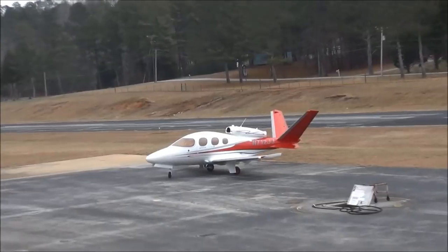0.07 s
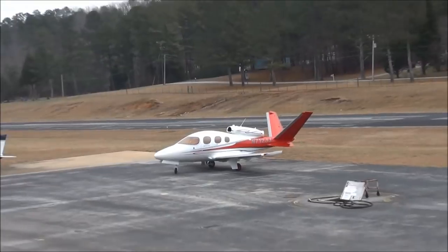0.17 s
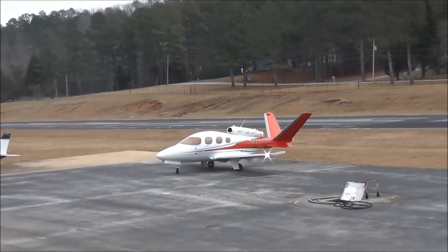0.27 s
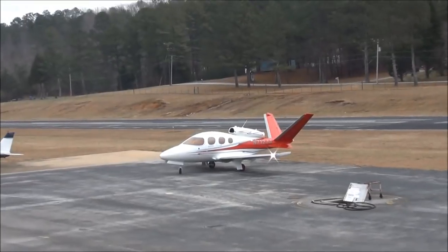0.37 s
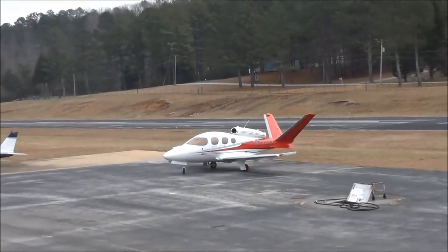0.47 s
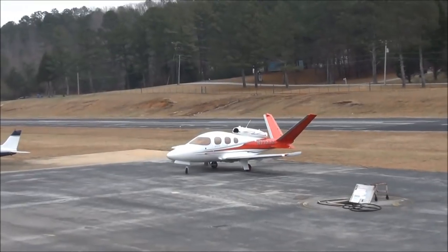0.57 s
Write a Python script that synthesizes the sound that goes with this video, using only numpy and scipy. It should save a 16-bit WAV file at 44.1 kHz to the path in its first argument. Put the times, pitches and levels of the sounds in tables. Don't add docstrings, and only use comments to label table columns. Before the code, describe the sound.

Steady jet rush with several piercing, fluttering blade tones swells in, holds level pitch for a second, then the whine glides upward and blurs. Open tarmac, stereo microphone, engine slightly to the left.

```python
import sys
import numpy as np
from scipy import signal
from scipy.io import wavfile

SR = 44100
rng = np.random.default_rng(int(sys.argv[2]) if len(sys.argv) > 2 else 0)


def to_wav(sig):
    pcm = np.clip(np.atleast_2d(sig), -1, 1) * 32767
    pcm = np.round(pcm).astype(np.int16)
    wavfile.write(sys.argv[1], SR, pcm.T)


def natural_amplitude(level_db):
    exponent = np.asarray(level_db, float) / 20
    return 10 ** exponent


N = 97637


def rms_one(x):
    return x / np.sqrt(np.mean(x ** 2) + 1e-20)


def in_time(rows):
    seconds, *columns = np.transpose(rows)
    return [np.interp(np.arange(N) / SR, seconds, column) for column in columns]


def at_hz(points, hz):
    table_hz, value = np.array(points).T
    return np.interp(np.log(hz), np.log(table_hz), value)


def drift(rate_hz):
    hop, settle = 40, 2000
    r = np.exp(-2 * np.pi * rate_hz * hop / SR)
    slow = rng.standard_normal(N // hop + 2 + settle)
    slow = signal.lfilter([1], [1, -2 * r, r * r], slow)[settle:]
    return np.interp(np.arange(N) / hop, np.arange(len(slow)), rms_one(slow))


def sides(hz):
    # frequency in Hz, left over right in dB.
    lean = [(60, .1), (250, -.3), (600, 3), (1650, 3), (4970, 3), (8500, 1), (11500, 0)]
    return natural_amplitude(at_hz(lean, hz) * np.array([[.5], [-.5]]))


def duct_resonances(sound):
    # centre in Hz, width in Hz, gain in dB.
    duct = [(156.5, 45, 7), (282, 26, -2.5), (339, 21, 8), (449, 60, 4), (536, 81, -13), (633.4, 20, 7),
            (745, 58, -7), (897, 103, 5), (963, 66, 0), (1069, 67, 5.5), (1250, 390, -4.5), (1470, 160, 8),
            (2090, 190, -6.5), (10210, 1020, 6)]
    for hz, width_hz, db in duct:
        r = np.exp(-np.pi * width_hz / SR)
        poles = [1, -2 * r * np.cos(2 * np.pi * hz / SR), r * r]
        ringing = signal.lfilter([(1 - r * r) / 2, 0, (r * r - 1) / 2], poles, sound)
        sound = sound + (natural_amplitude(db) - 1) * ringing
    return sound


def late(sound, delay_s):
    heard_at = np.arange(N) - delay_s * SR
    return np.array([np.interp(heard_at, np.arange(N), channel) for channel in sound])


def reflections(direct):
    # time in seconds, delay in ms.
    hull_ms = [(.1, 4.95), (.6, 5.15), (1.0, 5.45), (1.4, 5.58), (1.8, 5.42), (2.21, 5.05)]
    # low edge in Hz, high edge in Hz.
    hull_band_hz = [1050, 2200]
    ground_s, ground_gain, ground_cut_hz, hull_gain = 0.0011723, 0.4, 1600, 0.9

    dull = signal.butter(1, ground_cut_hz, fs=SR)
    grounded = direct + ground_gain * signal.lfilter(*dull, late(direct, ground_s))
    hull_band = signal.butter(2, hull_band_hz, "band", fs=SR)
    off_hull = signal.lfilter(*hull_band, grounded)
    return grounded + hull_gain * late(off_hull, in_time(hull_ms)[0] / 1000)


def rush(patchy_db):
    # time in seconds, rush level in dB, tilt in dB per octave, duct howl in dB.
    thrust = [(.1, -11, -2.5, -3), (.4, -12.5, -2.5, -3), (.7, -13, -1.5, 1.5), (1.0, -11.5, -1, -1),
              (1.3, -12.5, -1.5, 0), (1.6, -12.5, -2, 0), (1.9, -12.5, -2, 2.5), (2.21, -12.5, -2, 2.5)]
    # frequency in Hz, level in dB per Hz.
    rush_colour = [(25, -9), (110, -26.5), (160, -17), (848, -10.5), (2620, -2.5), (10300, -9.5),
                   (13500, -11.5), (15500, -18)]
    # frequency in Hz, likeness from 0 to 1.
    likeness = [(60, .99), (200, .94), (600, .9), (1500, .93), (3000, .72), (5500, .66), (9000, .82),
                (11500, 1)]
    howl_hz, howl_octaves = 1530, 0.27
    hollow_hz, hollow_octaves, hollow_share = 4370, 0.25, 0.61

    level_db, tilt, howl_db = in_time(thrust)
    together = drift(4)
    band_edges = 25 * 2 ** np.arange(0, 9.5, 1 / 3)
    white = rng.standard_normal((2, 2, N))
    noise = 0
    for k, (low, high) in enumerate(zip(band_edges, band_edges[1:])):
        band = signal.butter(2, [low, high], "band", fs=SR, output="sos")
        mid, side = signal.sosfilt(band, white[k % 2])
        hz = np.sqrt(low * high)
        peak = np.exp(-(np.log2(hz / howl_hz) / howl_octaves) ** 2)
        hollow = np.exp(-(np.log2(hz / hollow_hz) / hollow_octaves) ** 2)
        howl = howl_db * (peak - hollow_share * hollow)
        tilted = tilt * np.log2(max(hz, 500) / 1500)
        flicker = .5 * together + 1.09 * drift(3.3) + 0.76 * drift(24)
        gain = natural_amplitude(at_hz(rush_colour, hz) + howl + tilted + patchy_db * flicker)
        alike = np.clip(at_hz(likeness, hz), 0, 1)
        stereo = np.sqrt(1 + alike) * mid + np.sqrt(1 - alike) * side * [[1], [-1]]
        noise = noise + gain * sides(hz) * stereo
    return natural_amplitude(level_db) * rms_one(reflections(duct_resonances(noise)))


def tone(hz, db, flutter_db=2.5):
    # time in seconds, share of noisy skirt.
    scatter_rows = [(.1, .1), (1.4, .12), (1.7, .35), (2.21, .7)]
    flutter_hz, skirt_hz = 14, 27.8

    pitch = hz.mean()
    scatter = in_time(scatter_rows)[0] * (pitch < 6000)
    turns = np.cumsum(hz) / SR + rng.random() + .04 * drift(flutter_hz)
    apart = 0.045 * np.clip(1 - pitch / 11000, 0, 1) * drift(2.1) * np.array([[1], [-1]])
    skirt = drift(skirt_hz) + 1j * drift(skirt_hz)
    air = (1 + scatter * skirt) / np.sqrt(1 + 2 * scatter ** 2)
    wave = np.imag(air * np.exp(2j * np.pi * (turns + apart)))
    return np.sqrt(2) * natural_amplitude(db + flutter_db * drift(flutter_hz)) * sides(pitch) * wave


def two_paths():
    nulls_s = [.02, .2, .4, .63, .83, 1.005, 1.17, 1.555, 1.745, 1.9, 2.05, 2.23]
    second_path = .85
    beat = np.interp(np.arange(N) / SR, nulls_s, np.arange(len(nulls_s)))
    paths = np.abs(1 - second_path * np.exp(2j * np.pi * beat)) / (1 + second_path)
    return paths ** .6


def whine():
    # time in seconds, turns per second in Hz.
    shaft_speed = [(0.11, 170.49), (0.52, 169.57), (0.75, 169.22), (0.92, 169.13), (1.05, 169.29),
                   (1.16, 169.69), (1.26, 170.43), (1.36, 171.42), (1.47, 173.01), (1.55, 174.59),
                   (1.66, 176.92), (1.8, 180.49), (1.96, 184.96), (2.21, 191.75)]
    strong_orders = [59, 15, 44, 29]
    # time in seconds, levels in dB of orders 59, 15, 44, 29.
    strong_levels = [(0.11, -16.5, -12.5, -31.5, -23), (0.25, -17.5, -12.5, -44.5, -24),
                     (0.36, -18.5, -11.5, -20.5, -36), (0.52, -12, -19.0, -33, -47),
                     (0.63, -18.5, -14.5, -24.5, -21.5), (0.75, -15, -33, -36, -29),
                     (0.83, -19, -21, -22.5, -32), (0.92, -16.5, -21, -24.0, -27),
                     (1.05, -18, -12.5, -24.5, -22.5), (1.16, -14.5, -29.0, -24, -31),
                     (1.26, -16, -28, -40, -22.5), (1.36, -22, -31.5, -26.5, -19),
                     (1.47, -13, -20.5, -19.5, -26.5), (1.55, -19, -19.5, -24.0, -31),
                     (1.66, -17.5, -30, -20.5, -42), (1.8, -20.5, -24.5, -24, -33),
                     (1.96, -36, -28.0, -30, -34.5), (2.21, -21.5, -27, -21, -31)]
    faint_orders = [30, 45, 60, 74, 75, 89]
    # time in seconds, levels in dB of orders 30, 45, 60, 74, 75, 89, of core, of core plus fan.
    faint_levels = [(0.11, -39.0, -45.0, -33.0, -35.0, -43.0, -52.0, -36.0, -31.0),
                    (0.36, -39.0, -40.0, -37.0, -32.0, -43.0, -47.0, -38.0, -39.0),
                    (0.63, -32.0, -38.0, -33.0, -37.0, -42.0, -41.0, -33.0, -33.0),
                    (0.83, -34.0, -36.0, -28.0, -35.0, -40.0, -38.0, -31.0, -31.0),
                    (1.05, -35.0, -38.0, -36.0, -26.0, -39.0, -39.0, -34.0, -36.0),
                    (1.36, -36.0, -39.0, -37.0, -32.0, -48.0, -60.0, -36.0, -29.0),
                    (1.66, -41.0, -38.0, -41.0, -37.0, -49.0, -57.0, -34.0, -38.0),
                    (1.96, -35.0, -34.0, -39.0, -38.0, -49.0, -60.0, -35.0, -39.0),
                    (2.21, -31.0, -33.0, -37.0, -37.0, -46.0, -60.0, -37.0, -37.0)]
    # time in seconds, pitch in Hz.
    core_pitch = [(.1, 4840), (.9, 4835), (1.15, 4860), (1.45, 4950), (1.72, 5050), (1.92, 5130),
                  (2.21, 5215)]

    shaft, = in_time(shaft_speed)
    core, = in_time(core_pitch)
    *faint, core_db, sum_db = in_time(faint_levels)
    strong = in_time(strong_levels)
    turbine, *others = [tone(k * shaft, db, flutter_db=1.2) for k, db in zip(strong_orders, strong)]
    others += [tone(k * shaft, db) for k, db in zip(faint_orders, faint)]
    fan = strong_orders[1] * shaft
    return two_paths() * turbine + sum(others) + tone(core, core_db) + tone(core + fan, sum_db)


def scene():
    return rush(patchy_db=1.2) + whine()


def band_limit(x):
    return signal.sosfilt(signal.butter(12, 15700, fs=SR, output="sos"), x)


def record(dry):
    start_s, step_s, steps = .1028, 1 / 30, 45
    low_cut_hz, ceiling = 162, 1.25
    fade = np.clip(np.ceil((np.arange(N) / SR - start_s) / step_s), 0, steps) / steps
    low_cut = signal.butter(2, low_cut_hz, "high", fs=SR, output="sos")
    faded = signal.sosfilt(low_cut, dry) * fade
    return band_limit(ceiling * np.tanh(faded / ceiling))


dry = scene()
out = record(dry)
to_wav(out)
```